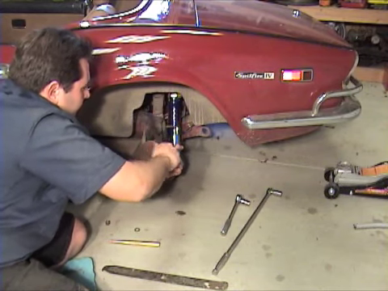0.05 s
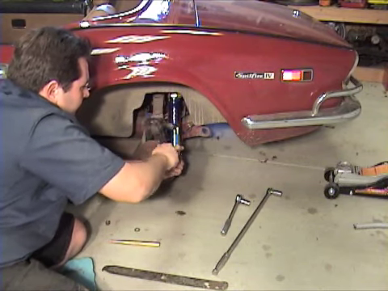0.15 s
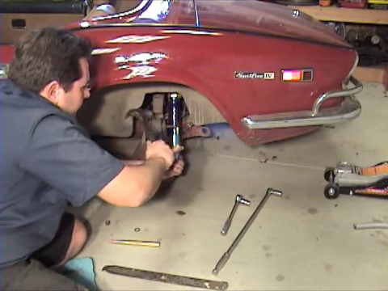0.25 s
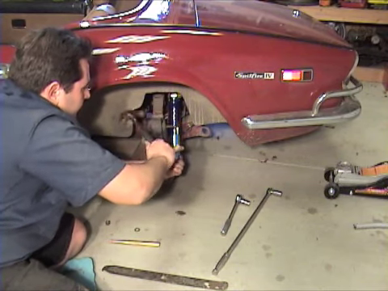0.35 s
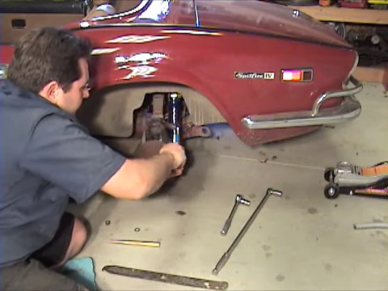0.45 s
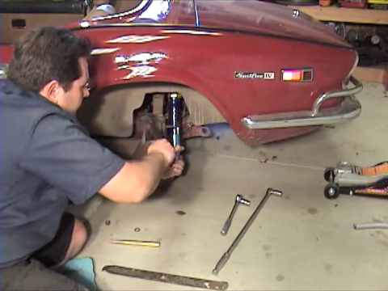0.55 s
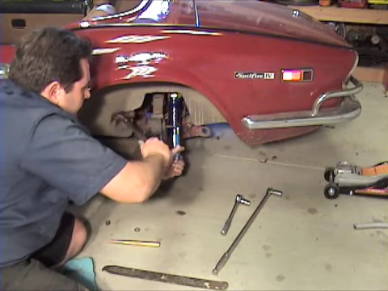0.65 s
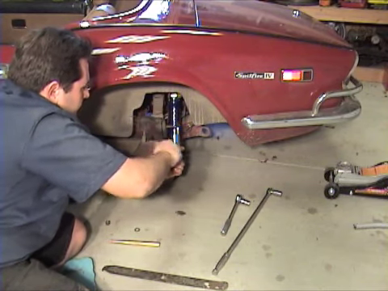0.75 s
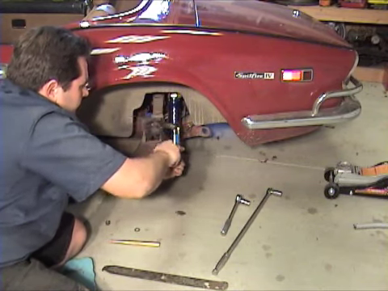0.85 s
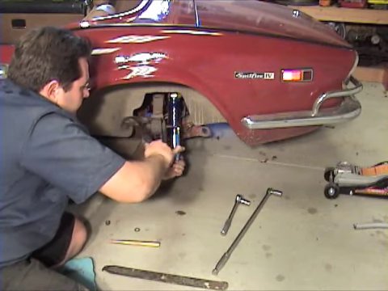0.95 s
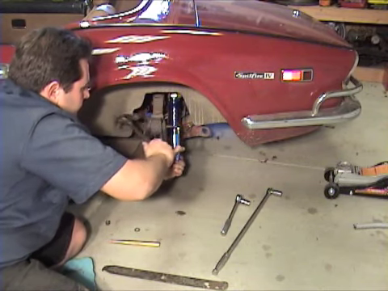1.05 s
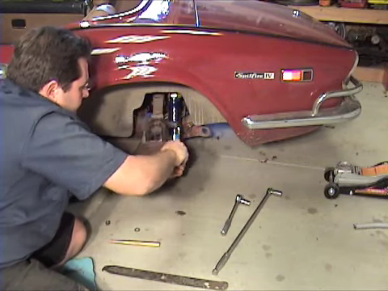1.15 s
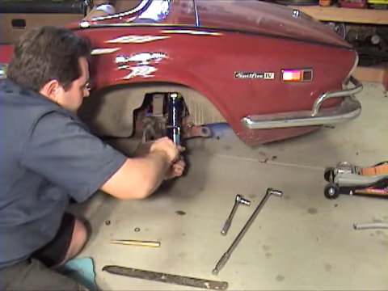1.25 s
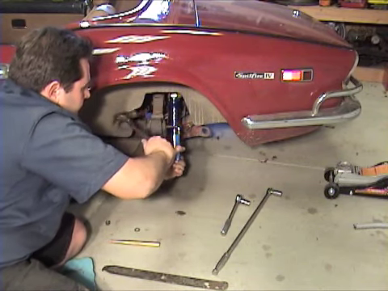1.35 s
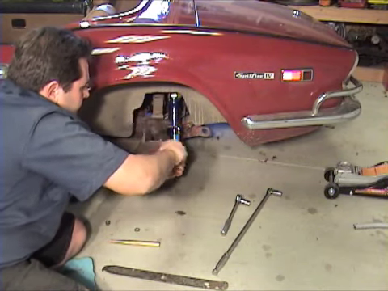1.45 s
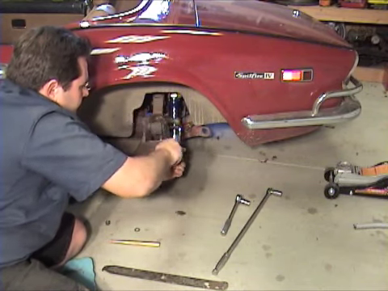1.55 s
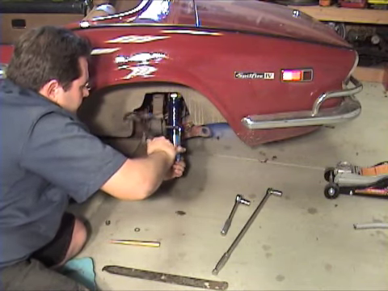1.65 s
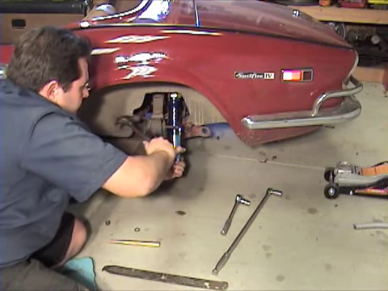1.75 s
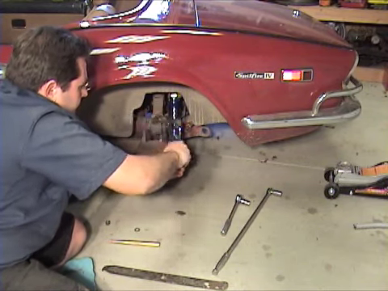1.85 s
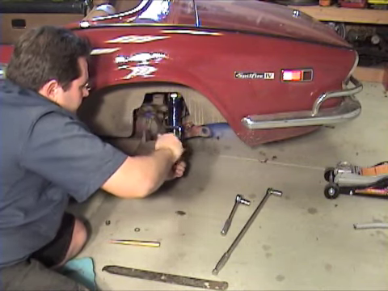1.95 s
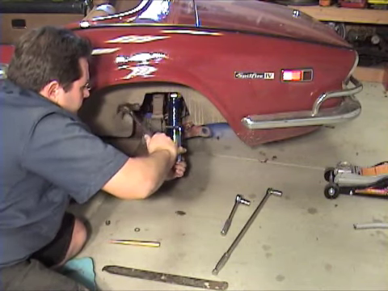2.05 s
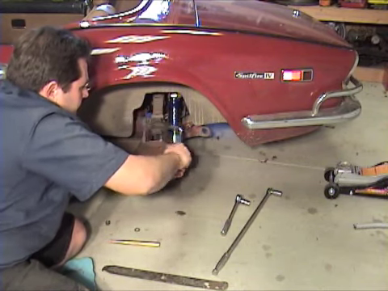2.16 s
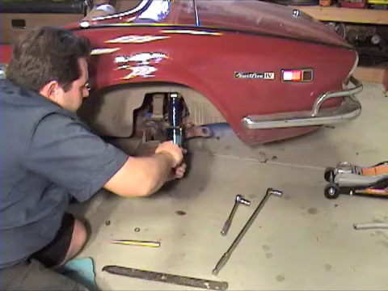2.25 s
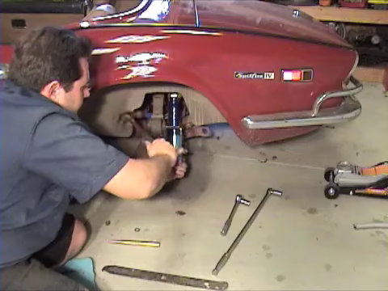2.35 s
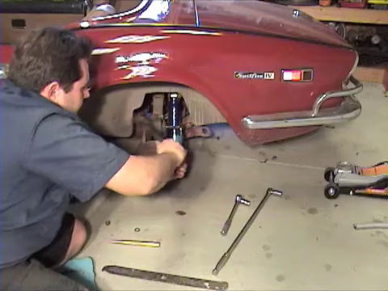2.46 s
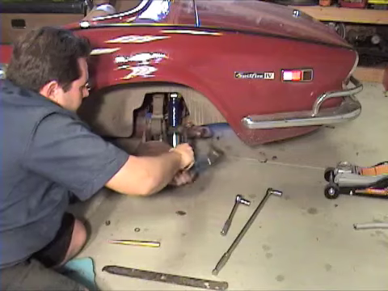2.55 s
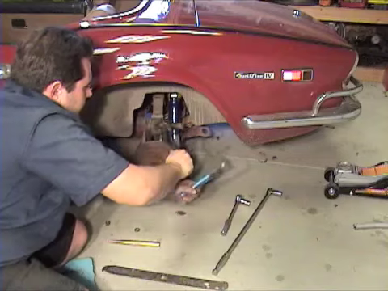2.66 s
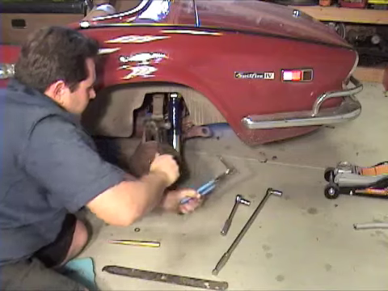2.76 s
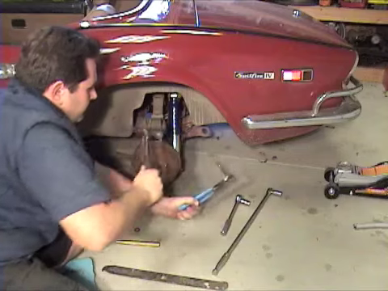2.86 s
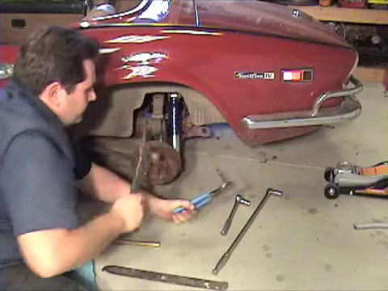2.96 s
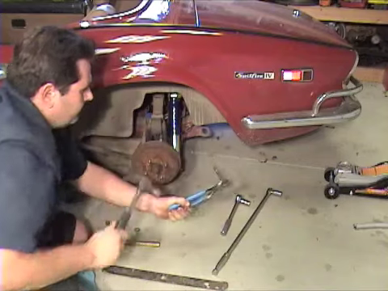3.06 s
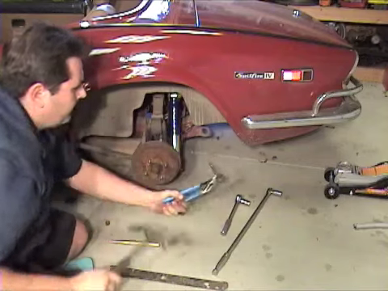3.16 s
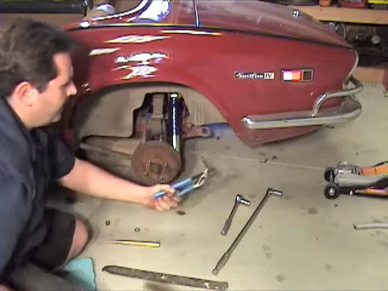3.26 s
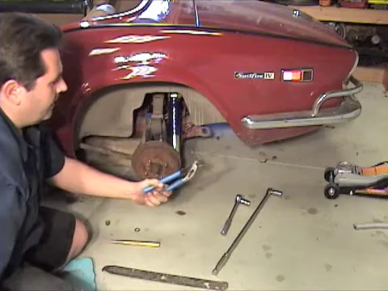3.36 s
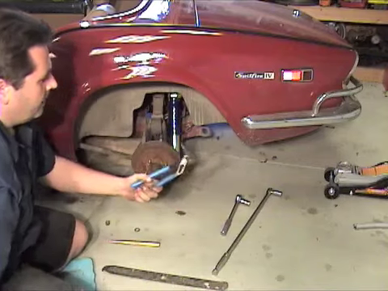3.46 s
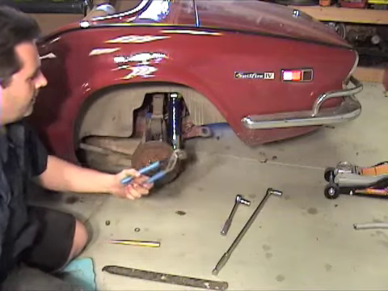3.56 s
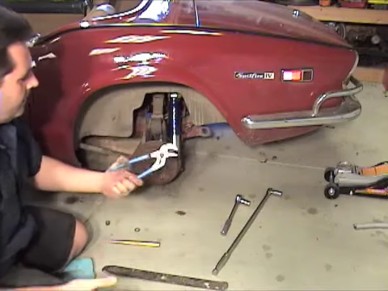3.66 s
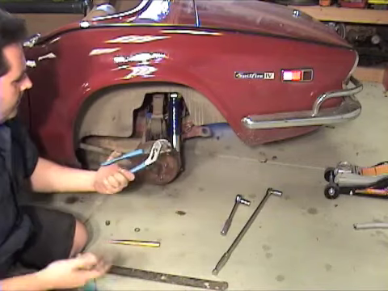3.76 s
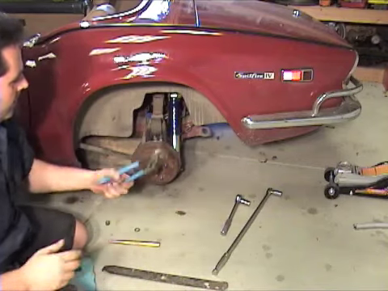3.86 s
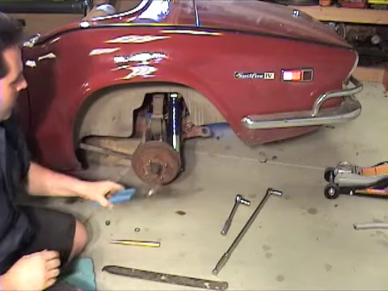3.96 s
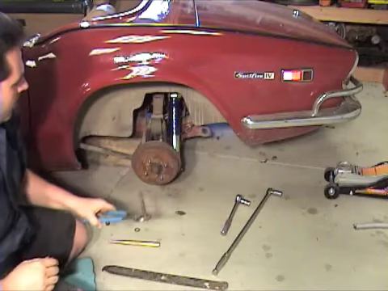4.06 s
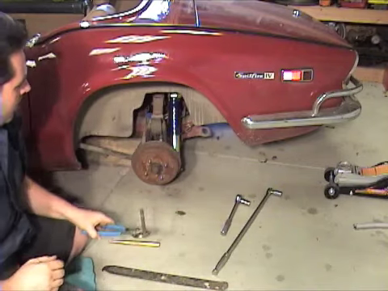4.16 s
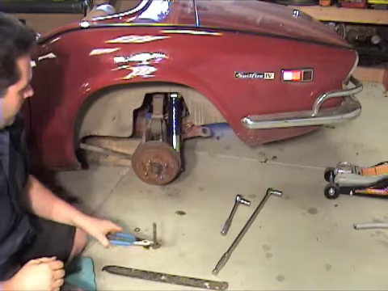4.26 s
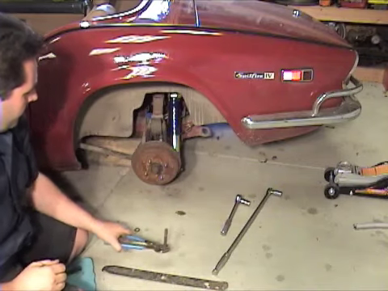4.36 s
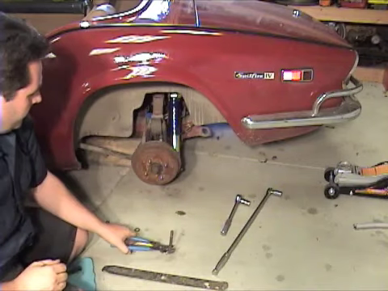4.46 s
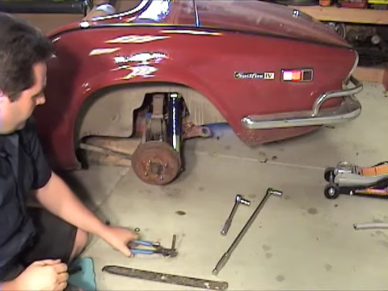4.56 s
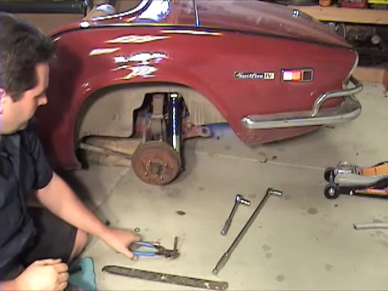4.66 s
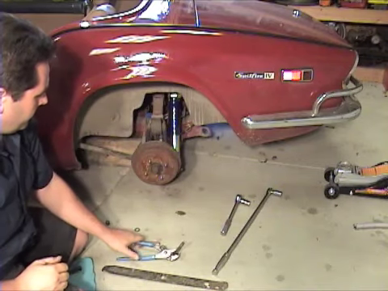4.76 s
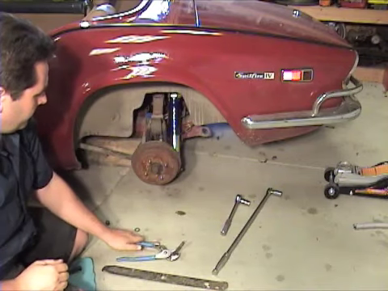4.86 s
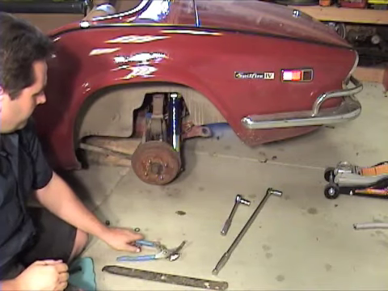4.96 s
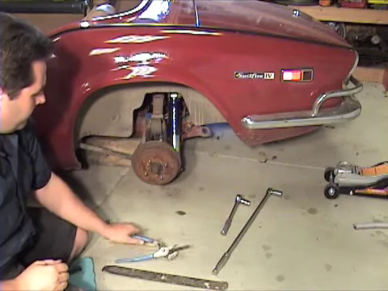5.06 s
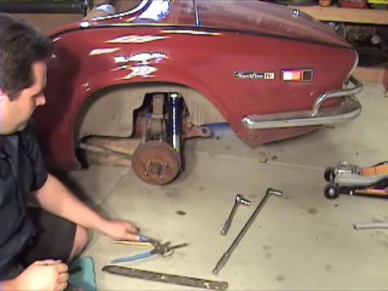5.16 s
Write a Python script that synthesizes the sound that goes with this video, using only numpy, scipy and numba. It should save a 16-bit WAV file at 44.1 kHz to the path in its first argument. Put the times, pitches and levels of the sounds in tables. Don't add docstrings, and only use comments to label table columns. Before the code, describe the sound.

In a hard-walled garage, a hammer strikes steel pliers in eight loud, even blows, each cracking, ringing and booming in the car panels. After the last, the echo dies, the hammer knocks and bounces on concrete, cloth rustles, and the pliers rattle down. A camera microphone with automatic gain swells the echoes over hiss and hum.

```python
import sys
import numpy as np
from scipy import signal
from scipy.fft import rfft, irfft
from scipy.io import wavfile
from scipy.ndimage import map_coordinates
from numba import njit

SR = 44100
rng = np.random.default_rng(int(sys.argv[2]) if len(sys.argv) > 2 else 0)


def wav_out(sig):
    wavfile.write(sys.argv[1], SR, np.round(np.clip(np.atleast_2d(sig).T, -1, 1) * 32767).astype(np.int16))


def convert_level_to_amplitude(level_db):
    exponent = np.asarray(level_db, float) / 20
    return 10 ** exponent


N = 229320
LEAD = SR // 4
SPAN = 24000
HZ = np.fft.rfftfreq(2 * SPAN, 1 / SR)
OCTAVE = np.log2((HZ + 200) / 3000)


def unit(x):
    return x / np.sqrt(np.mean(np.abs(x) ** 2) + 1e-20)


def along(points, hz):
    f, v = np.transpose(points)
    return np.interp(np.log(hz + 1), np.log(f + 1), v)


def causal(db):
    cepstrum = irfft(np.maximum(db, -120) * np.log(10) / 20)
    cepstrum[1:SPAN] *= 2
    cepstrum[SPAN + 1:] = 0
    return np.exp(rfft(cepstrum))


def resonance(hz, width, db):
    return convert_level_to_amplitude(db) * 1j * HZ * width / (hz * hz - HZ * HZ + 1j * HZ * width)


def modes(rows, scatter_db):
    total = 0
    for k, (hz, width, db) in enumerate(rows):
        total = total + (-1) ** k * resonance(hz, width, db + scatter_db * rng.standard_normal())
    return total


def rings(rows, lift_db):
    peaks = [1 + resonance(hz, width, db + lift_db + 1.2 * rng.standard_normal()) for hz, width, db in rows]
    return np.prod(peaks, axis=0)


# frequency in Hz, left-right likeness 0 to 1.
STEREO_LIKENESS = [(40, .5), (125, 1), (400, 0.94), (1000, 0.67), (4000, 0.57), (9000, 0.39), (13000, 1)]


def stereo(pair, hz, near=0):
    turn = np.arccos(np.clip(along(STEREO_LIKENESS, hz), 0, 1)) / 2 * (1 - np.clip(near, 0, 1))
    mid, side = pair[0] * np.cos(turn), pair[1] * np.sin(turn)
    return np.array([mid + side, mid - side])


def chatter(t60_s, spike=0):
    t = np.arange(SPAN // 3) / SR
    decay = convert_level_to_amplitude(-60 * t / t60_s) * (1 + spike * convert_level_to_amplitude(-60 * t / 0.004))
    x = rng.standard_normal((2, len(t))) * decay
    x = x / np.linalg.norm(x, axis=1)[:, None]
    return stereo(rfft(x, 2 * SPAN), HZ, near=0.45)


# frequency in Hz, t60 in seconds.
ECHO_T60 = [(60, 1), (250, 0.64), (1000, 0.65), (3500, 0.59), (7000, 0.47), (12000, 0.38)]
# frequency in Hz, level in dB.
ECHO_COLOUR = [(100, -3.5), (400, 1), (1500, 1.5), (4000, -1), (8000, -5.5), (14000, -6)]


def garage(onset_s):
    hz = np.fft.rfftfreq(256, 1 / SR)[:, None]
    t = np.arange(SPAN // 128 + 2) * 128 / SR
    z = rng.standard_normal((2, len(hz), len(t), 2)) @ [1, 1j]
    level_db = along(ECHO_COLOUR, hz) - 60 * t / along(ECHO_T60, hz)
    tail = signal.istft(z * convert_level_to_amplitude(level_db), SR, nperseg=256)[1][:, :SPAN]
    tail *= 1 - 0.47 * np.exp(-(np.arange(SPAN) / SR / onset_s) ** 2)
    return stereo(rfft(tail / np.linalg.norm(tail[0]), 2 * SPAN), HZ)


def add(out, s, straight, sound, wet_db):
    start = LEAD + round(s * SR)
    heard = straight + sound * convert_level_to_amplitude(wet_db) * garage(onset_s=0.0062)
    out[:, start:start + SPAN] += irfft(heard)[:, :SPAN]


def noise(spectrum):
    hz = np.fft.rfftfreq(N, 1 / SR)
    white = stereo(rfft(rng.standard_normal((2, N))), hz)
    return unit(irfft(white * convert_level_to_amplitude(along(spectrum, hz)), N))


def drift(t):
    return map_coordinates(rng.standard_normal(60), [t * 9])


# frequency in Hz, level in dB per Hz.
HISS_SPECTRUM = [(15, -29), (25, -18), (64, -10.5), (183, -13), (322, -14), (552, -10.5), (999, -13),
                 (1500, -16), (3000, -20), (6000, -25.5), (10400, -28.5), (13000, -40), (15600, -55.5)]


def hiss():
    return convert_level_to_amplitude(-56.5 - 1) * noise(HISS_SPECTRUM)


# frequency in Hz, level in dB.
HUM_PARTIALS = [(242.2, 0), (543.7, -7), (958.2, -11.5), (5394, -18.5)]


def hum(t):
    level_db, duck_db, recover_s = -59.5, 22, 0.44
    since_last_blow = np.maximum(t - BLOWS[-1][0], 0)
    hum_db = level_db - duck_db * np.exp(-since_last_blow / recover_s)
    total = 0
    for hz, db in HUM_PARTIALS:
        level = convert_level_to_amplitude(hum_db + db + 1 + 2.2 * drift(t))
        total = total + level * np.sin(2 * np.pi * hz * t + 0.28 * drift(t))
    return total


# peak time in seconds, peak level in dB, rise and fall by 15 dB in seconds.
ARM_MOVES = [
    (3.424, -57, 0.26, .02),
    (4.478, -57.5, 0.2, 0.24),
]
# frequency in Hz, level in dB.
CLOTH_SPECTRUM = [(300, -7), (1000, -1), (2500, 4.5), (6000, -2), (9500, -2), (13000, -12)]


def sleeve(t):
    rub = 0
    for s, db, rise_s, fall_s in ARM_MOVES:
        rub = rub + convert_level_to_amplitude(db - 15 * np.maximum((s - t) / rise_s, (t - s) / fall_s))
    return convert_level_to_amplitude(1 + 0.99 * drift(t)) * rub * noise(CLOTH_SPECTRUM)


def clatter(out, events, steel, wet_db):
    treble_cut_db = 9 * np.log2(1 + (HZ / 11000) ** 9)
    bass_cut_db = 6 * np.log2(1 + (500 / (HZ + 20)) ** 3.6)
    for s, db, thump_db, bright_db, ring_db, t60_s in events:
        tick = causal(bright_db * OCTAVE - treble_cut_db - bass_cut_db)
        thump = convert_level_to_amplitude(thump_db + 31) * modes([(200, 118, 0), (290, 100, 0)], scatter_db=2.5)
        sound = convert_level_to_amplitude(db + 5) * (tick * rings(steel, ring_db) + thump)
        add(out, s, sound * chatter(t60_s, spike=0.88), sound, wet_db)


# start in seconds, force in dB, brightness in dB per octave, ring in dB.
LAY_TOUCHES = [(4.6962, -17.5, -5, -4.5), (4.818, -22, 0, 1.5), (4.8411, -19.5, -5.5, 6.5),
               (4.8476, -20, -2.5, 4.5), (4.8605, -13.5, -1, 3.5), (4.877, -15.5, 3, 3),
               (4.8821, -18, 2, 5), (5.0932, -35.5, -9.5, 10), (5.1003, -33, -3.5, 2.5),
               (5.1138, -24, -3.5, 2.5), (5.1318, -13.5, 2, -1), (5.1411, -16, 1.5, 2.5),
               (5.1518, -7.5, 2.4, 2)]
# frequency in Hz, width in Hz, level in dB.
JAW_MODES = [(1580, 100, 6), (2760, 121, 6.5), (3250, 73, 2.5), (4000, 60, 0), (4620, 90, 2),
             (4900, 120, 5), (5400, 90, 9.5), (6050, 90, 2), (6560, 100, 6), (6770, 70, 9), (7000, 160, 5),
             (7640, 200, 3), (10400, 710, 3)]


def pliers_down(out):
    thump_db, thump_per_dull, t60_s = -31, 1.5, 0.057
    touches = []
    for s, db, bright_db, ring_db in LAY_TOUCHES:
        touches.append((s, db, thump_db - thump_per_dull * bright_db, bright_db, ring_db, t60_s))
    clatter(out, touches, JAW_MODES, wet_db=-4)


# start in seconds, force in dB, thump in dB, brightness in dB per octave, contact t60 in seconds.
HEAD_TOUCHES = [
    (3.3281, -43, -48.5, 4, 0.0053),
    (3.4583, -14, -34, -6, .0052),
    (3.5154, -14.5, -51, -9.5, 0.036),
    (3.5433, -21, -32, -7, 0.01),
    (3.5706, -34.5, -63, -3, 0.0039),
    (3.5973, -25.5, -39.5, -2, 0.0048),
    (3.6313, -29, -27, 4.5, 0.033),
]
# start in seconds, thump in dB.
HANDLE_ROCKS = [
    (3.7647, -38),
    (3.7905, -40.5),
    (3.8391, -46),
]
# frequency in Hz, width in Hz, level in dB.
HELD_MODES = [(476, 60, 0), (2250, 1100, 8), (3030, 300, -2)]
# frequency in Hz, width in Hz, level in dB.
HAMMER_MODES = [(470, 42, 4.5), (1060, 230, -11), (1655, 196, 16), (2260, 380, -4), (2940, 410, 10),
                (4700, 930, 1.5), (5770, 230, -7), (9500, 69, 13)]


def hammer_drop(out):
    head_ring_db, handle_tick_db, handle_t60_s = 2.5, -16, 0.017
    head = []
    for s, db, thump_db, bright_db, t60_s in HEAD_TOUCHES:
        head.append((s, db, thump_db - db, bright_db, head_ring_db, t60_s))
    handle = [(s, db + handle_tick_db, -handle_tick_db, -0.7, -10.5, handle_t60_s) for s, db in HANDLE_ROCKS]
    clatter(out, head[:2], HELD_MODES, wet_db=-5)
    clatter(out, head[2:] + handle, HAMMER_MODES, wet_db=-5.5)


# frequency in Hz, level in dB.
CRACK_SPECTRUM = [(180, -45), (300, -10.5), (1220, -3.5), (1820, -1.5), (2530, -0.5), (5230, 1), (5870, 0),
                  (8440, 2), (10600, -6.5), (13200, -22), (15600, -53.5)]


def crack(bright_db):
    clang_per_dull, knock_db = 2.3, 0.8
    clang = -clang_per_dull * bright_db * np.exp(-(OCTAVE / 0.77) ** 2)
    knock = knock_db * np.exp(-((OCTAVE + 0.77) / 0.5) ** 2)
    return causal(along(CRACK_SPECTRUM, HZ) + bright_db * OCTAVE + clang + knock)


# frequency in Hz, width in Hz, level in dB.
PLIERS_MODES = [(848, 78, -3), (1159, 37, -3.5), (1820, 32, -13.5), (2650, 82, -12.5), (3760, 350, -6.5),
                (4150, 23, -4), (5890, 130, -12.5), (7700, 140, -10.5)]


def pliers_ring(ring_hz, ring_db):
    width_hz, overtone, overtone_db = 130, 1.75, -3.5
    grip = [(ring_hz, width_hz, ring_db), (overtone * ring_hz, width_hz, ring_db + overtone_db)]
    return rings(PLIERS_MODES + grip, lift_db=1)


# frequency in Hz, width in Hz, level in dB.
PANEL_MODES = [(52.8, 7.2, -14.5), (82.6, 18, -6.5), (123.8, 15, -16), (174, 28, -3), (235.3, 15.7, -6.5),
               (274, 18, 0.5), (330.5, 29, -6), (406, 74, -6), (508, 46, -13.5)]


def panel_boom(boom_db, bright_db):
    boom_per_dull = 0.6
    panels = convert_level_to_amplitude(boom_db + 16.5) * (0.21 + modes(PANEL_MODES, scatter_db=1.5))
    panels = panels / (1 + 1j * HZ / 500) ** 2 / (1 + 55 / (1j * HZ + 1)) ** 2
    late = np.exp(-2j * np.pi * HZ * 0.015)
    return convert_level_to_amplitude(12.5 - boom_per_dull * bright_db) * panels * late


# start in seconds, force in dB, brightness in dB per octave, ring in Hz, ring in dB.
BLOWS = [
    (-.15, 12.5, 0.5, 3850, 5),
    (0.2, 9, 0.3, 2616, -6.5),
    (0.5522, 9, 0.5, 2610, -0.5),
    (0.896, 9.5, 1.33, 4310, -5.5),
    (1.2447, 9, 2.1, 4150, -7.5),
    (1.5687, 1.5, -1, 3680, 14),
    (1.9263, 0, -4, 2700, -6.5),
    (2.2793, 9, 0, 1750, 1),
    (2.6144, 5.5, 2.35, 3500, 5),
]
# start in seconds, force in dB, brightness in dB per octave.
REBOUNDS = [
    (0.2073, 1, -2),
    (1.5877, 7.5, 1.5),
    (1.9485, 3, 1),
]


def blows(out):
    blow_boom_db, freed_boom_db, rebound_boom_db = 4, -3.5, -5.5
    rebound_ring_hz, rebound_ring_db = 7800, -8
    hits = [tuple(row) + (blow_boom_db,) for row in BLOWS[:-1]]
    hits.append(tuple(BLOWS[-1]) + (freed_boom_db,))
    hits += [tuple(row) + (rebound_ring_hz, rebound_ring_db, rebound_boom_db) for row in REBOUNDS]
    for s, db, bright_db, ring_hz, ring_db, boom_db in hits:
        steel = convert_level_to_amplitude(db + 15) * crack(bright_db) * pliers_ring(ring_hz, ring_db)
        boom = panel_boom(boom_db, bright_db)
        straight = steel * chatter(t60_s=0.061, spike=0.3) + boom * chatter(t60_s=0.19)
        add(out, s, straight, steel + convert_level_to_amplitude(7.5) * boom, wet_db=-2.5)


def scene():
    t = np.arange(N) / SR
    out = np.zeros((2, LEAD + N + SPAN))
    pliers_down(out)
    hammer_drop(out)
    blows(out)
    return out[:, LEAD:LEAD + N] + hiss() + hum(t) + sleeve(t)


# frequency in Hz, left minus right in dB.
PORT_LEAN = [(60, 1), (110, 0.5), (200, 3.5), (380, 2.5), (700, 3), (1290, 1.5), (2380, 0.5), (4400, 0.0),
             (8120, 1), (15000, -2.5)]


def ports(x):
    hz = np.fft.rfftfreq(N, 1 / SR)
    return irfft(rfft(x) * convert_level_to_amplitude(along(PORT_LEAN, hz) * [[0.5], [-0.5]]), N)


@njit
def follow(power, attack, release):
    level = np.empty_like(power)
    now = power[:400].max()
    for i in range(len(power)):
        now += (attack if power[i] > now else release) * (power[i] - now)
        level[i] = now
    return level


def gain_control(x):
    attack_s, release_s, threshold_db = 0.0004, 0.09, -6.5
    meter = follow(np.abs(x).max(0), 1 / (attack_s * SR), 1 / (release_s * SR))
    x = x / (1 + (meter / convert_level_to_amplitude(threshold_db)) ** 3) ** (1.15 / 3)
    return x / (1 + np.abs(x / 0.74) ** 6) ** (1 / 6)


def treble_limit(x):
    hz = np.fft.rfftfreq(N, 1 / SR)
    return irfft(rfft(x) * np.clip((15200 - hz) / 1600 + 0.5, 0, 1) ** 2, N)


def low_pass(x):
    return signal.sosfilt(signal.butter(12, 15700, fs=SR, output="sos"), x)


def record(dry):
    mix = treble_limit(gain_control(ports(dry)))
    return low_pass(mix)


dry = scene()
out = record(dry)
wav_out(out)
```